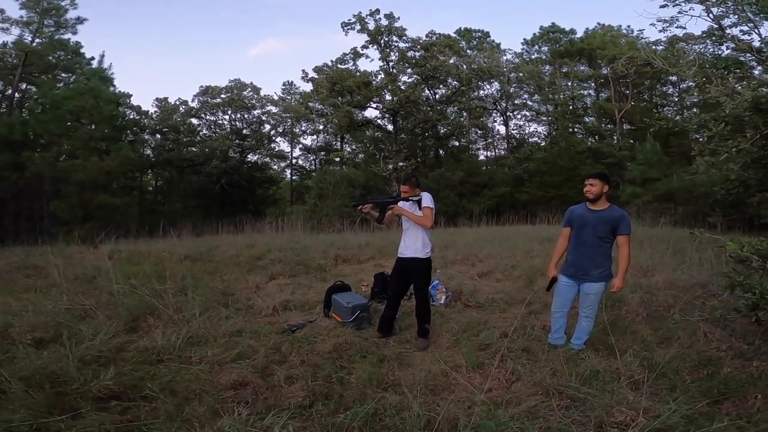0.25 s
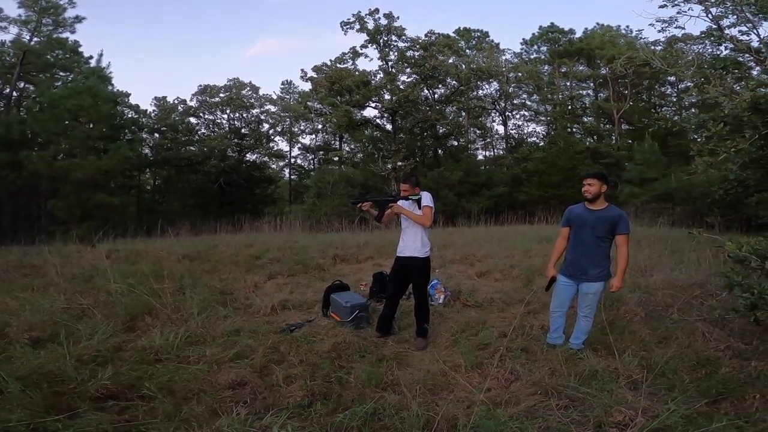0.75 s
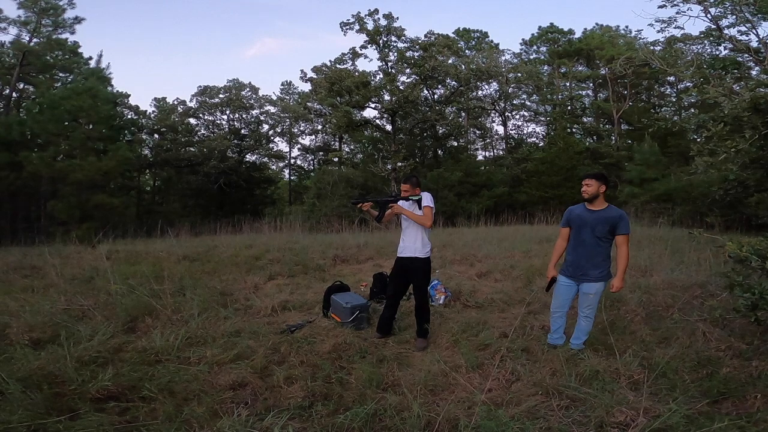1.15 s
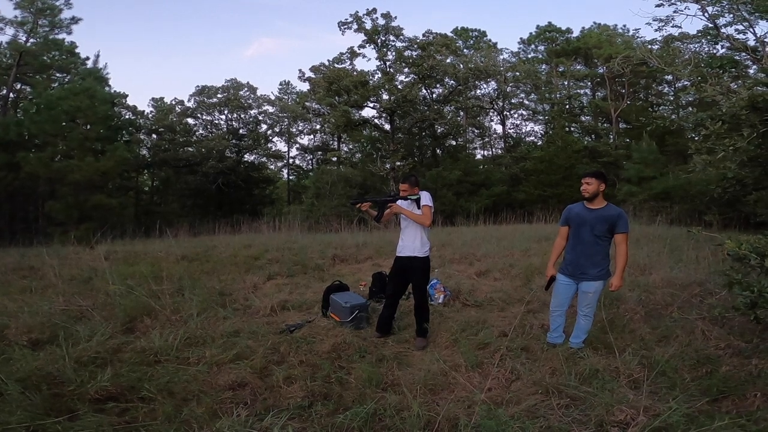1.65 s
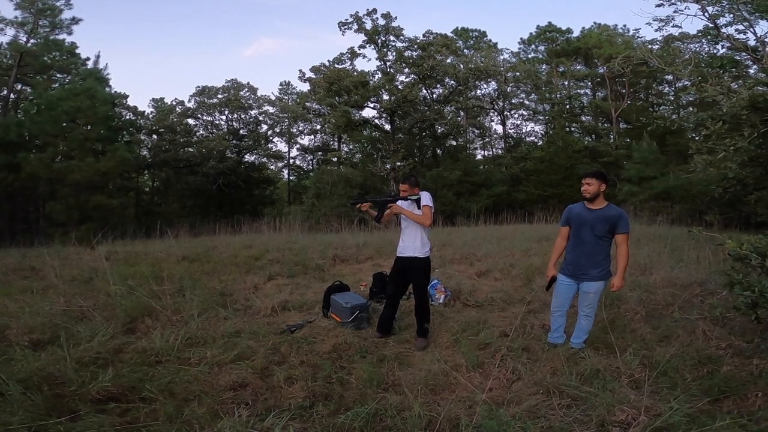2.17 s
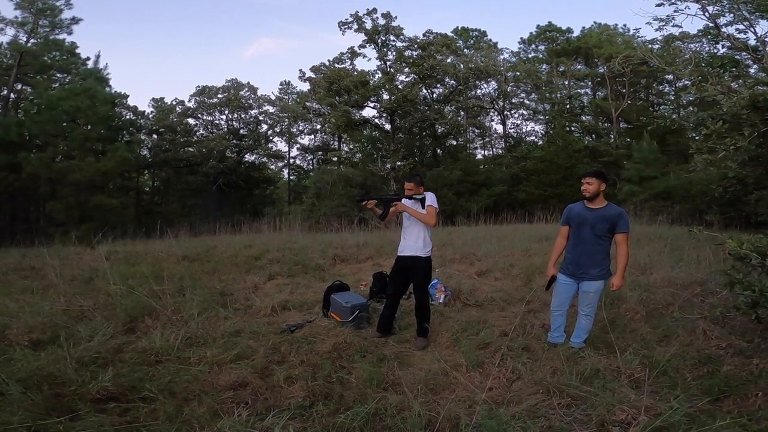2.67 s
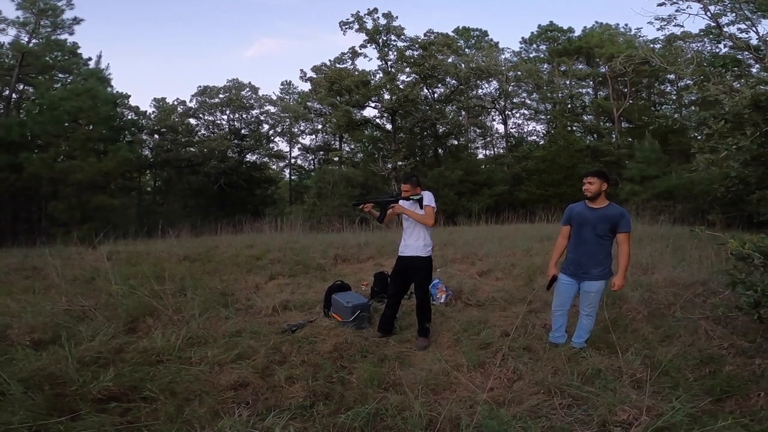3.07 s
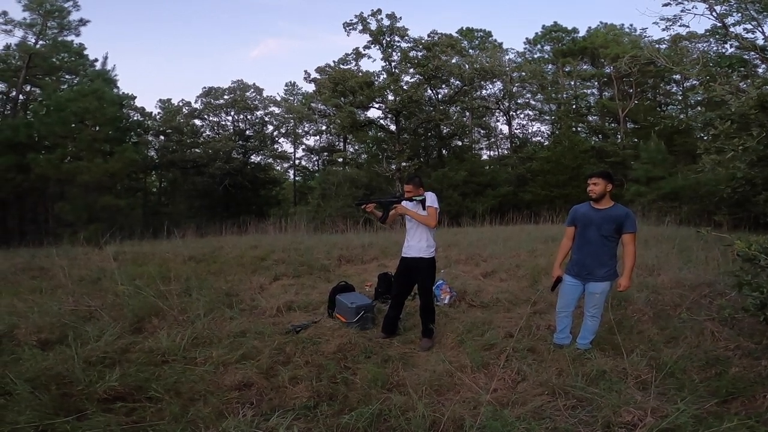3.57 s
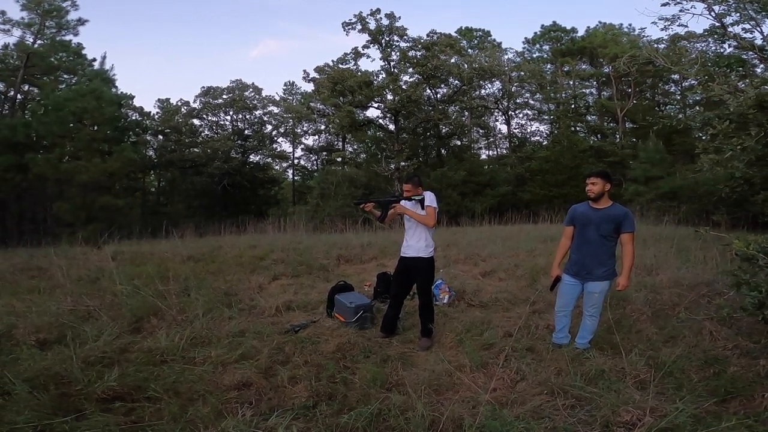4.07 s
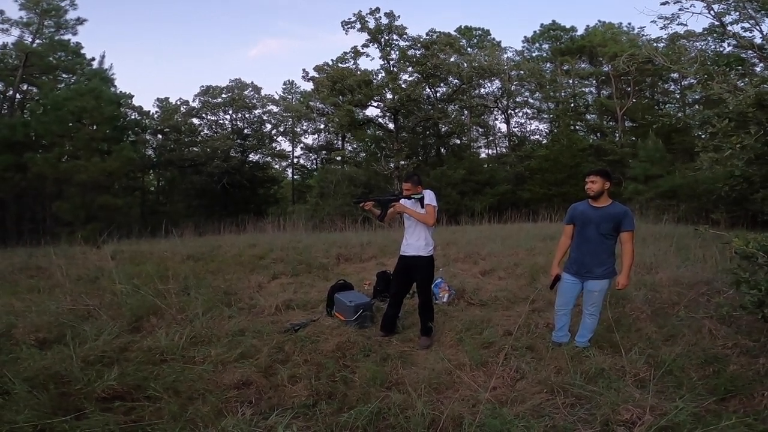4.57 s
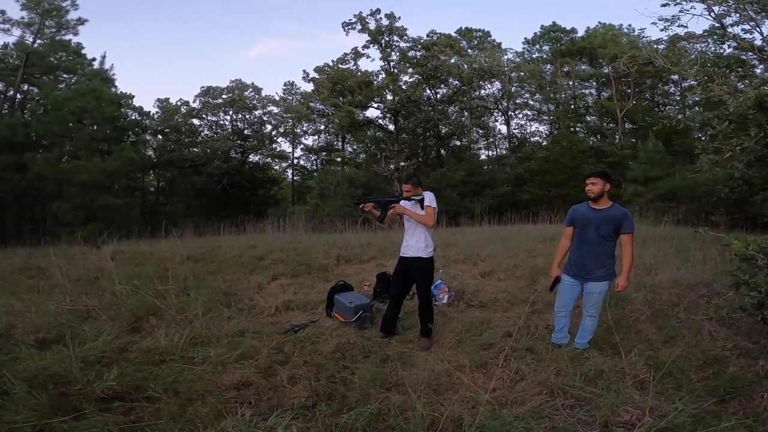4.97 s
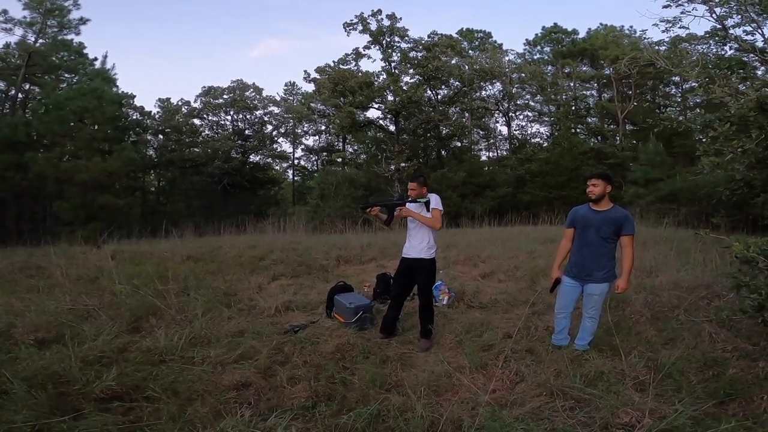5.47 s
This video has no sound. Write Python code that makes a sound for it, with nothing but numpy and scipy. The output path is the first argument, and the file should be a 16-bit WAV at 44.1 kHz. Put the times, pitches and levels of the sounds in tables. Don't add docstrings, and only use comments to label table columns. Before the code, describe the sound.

Crickets chirp in a quiet grassy clearing until a rifle blasts twice, overloading the microphone, each shot followed by a rolling echo from the woods.

```python
import sys
import numpy as np
from scipy import signal
from scipy.fft import rfft, irfft
from scipy.io import wavfile

SR = 44100
rng = np.random.default_rng(int(sys.argv[2]) if len(sys.argv) > 2 else 0)


def nominal_scale(level):
    x = np.asarray(level, float) / 20
    return 10 ** x


def to_wav(sig):
    pcm = np.clip(np.atleast_2d(sig), -1, 1) * 32767
    pcm = np.round(pcm).astype(np.int16)
    wavfile.write(sys.argv[1], SR, pcm.T)


N = 252368

# start in seconds, blast level in dB.
SHOTS = [
    (2.5186, -1.3),
    (5.2068, -2.66),
]
# frequency in Hz, density in dB per Hz.
ROLL_COLOUR = [(120, -29.5), (200, -22.5), (283, -7.5), (482, 2), (791, -9), (1100, -7), (3620, -18.5),
               (8900, -33), (16000, -55)]
# frequency in Hz, likeness from -1 to 1.
ROLL_LIKENESS = [(60, 1), (130, 1), (290, 1), (640, 0.86), (1410, 0.85), (3100, -0.59), (6820, 0.11),
                 (15000, -0.86)]
# frequency in Hz, left-right difference in dB.
ROLL_BALANCE = [(60, 3.5), (110, -2.5), (200, 1.0), (380, 3), (700, 4.5), (1290, 3), (2380, 6), (4400, 5.5),
                (8120, 1.5), (15000, 3)]
OLD_AGE_S = 3.38


def rms_one(x):
    return x / np.sqrt(np.mean(x ** 2) + 1e-20)


def at_hz(points, hz):
    points_hz, value = np.array(points).T
    return np.interp(np.log(hz), np.log(points_hz), value)


def drift(rate):
    r = np.exp(-80 * np.pi * rate / SR)
    slow = signal.lfilter([1], [1, -2 * r, r * r], rng.standard_normal(N // 40 + 2002))[2000:]
    return np.interp(np.arange(N) / 40, np.arange(len(slow)), rms_one(slow))


def ring(clicks, hz, t60):
    r, w = nominal_scale(-60 / (t60 * SR)), 2 * np.pi * hz / SR
    return signal.lfilter([0, np.sin(w)], [1, -2 * r * np.cos(w), r * r], clicks + 1e-18)


def low_pass(x, hz, order):
    return signal.sosfilt(signal.butter(order, min(hz, .45 * SR), fs=SR, output="sos"), x)


def without_bass(x, hz):
    return signal.sosfilt(signal.butter(1, hz, "high", fs=SR, output="sos"), x)


def sides(db):
    return nominal_scale(np.array([[db / 2], [-db / 2]]))


def add(out, x, s):
    i = round(s * SR)
    out[:, i:i + x.shape[1]] += x[:, :N - i]


def bands(source, colour, likeness, balance, age, patchy_db, treble_db=0, order=2, count=2):
    # frequency in Hz, loss in dB per second of travel.
    air_loss = [(200, -5), (500, -0.1), (1000, 2.5), (2000, 9.5), (4000, 24), (6000, 34), (8000, 48),
                (11000, 79), (16000, 108)]
    out, power, edges = 0, 0, 22 * 2 ** np.arange(0, 9.7, 1 / count)
    size = source.shape[-1]
    together = drift(6.5)[:size]
    for k, (low, high) in enumerate(zip(edges, edges[1:])):
        hz = np.sqrt(low * high)
        colour_db = at_hz(colour, hz)
        if colour_db < -90:
            continue
        band = signal.butter(order, [low, high], "band", fs=SR, output="sos")
        mid, side = signal.sosfilt(band, source[k % 2])
        alike = np.clip(at_hz(likeness, hz), -.9, .99)
        loss_db = age * at_hz(air_loss, hz) - treble_db * np.clip(np.log2(hz / 700), 0, 1)
        flicker_db = patchy_db * (together + drift(49)[:size])
        pair = np.sqrt(1 + alike) * mid + np.sqrt(1 - alike) * side * [[1], [-1]]
        out = out + nominal_scale(colour_db - loss_db + flicker_db) * sides(at_hz(balance, hz)) * pair
        power += nominal_scale(2 * colour_db) * 4 * (high - low) / SR
    return out / np.sqrt(power)


def clearing():
    # frequency in Hz, density in dB per Hz.
    hush_colour = [(15, -38.5), (25, -8.5), (80, 0.5), (217, -1.5), (285, -13), (463, -14.5), (714, -26.5),
                   (1130, -25), (2350, -35), (3820, -30.5), (5880, -43), (7310, -34.5), (8140, -35.5),
                   (9070, -32.5), (16000, -40.5)]
    # frequency in Hz, likeness from -1 to 1.
    hush_likeness = [(60, 0.91), (130, 0.66), (290, 0.51), (640, 0.67), (1410, 0.3), (3100, 0.39),
                     (6820, -0.25), (15000, -0.64)]
    balance = [(60, .1), (250, -1.1), (1000, .1), (8000, 1.1)]   # Hz, left-right dB
    noise = rng.standard_normal((2, 2, N))
    return nominal_scale(-52) * bands(noise, hush_colour, hush_likeness, balance, 0, patchy_db=.15, count=3)


def chorus():
    # pitch in Hz, level in dB, ringing t60 in seconds.
    far_bands = [
        (7130, -84, .012),
        (7630, -83, .014),
    ]
    out = np.zeros((2, N))
    for hz, db, t60 in far_bands:
        tone = ring(ring(rng.standard_normal((2, N)), hz, t60), hz, t60)
        out += nominal_scale(db + 1.5 * drift(3)) * rms_one(tone)
    return out


def cricket(chirps, hz, width):
    stroke_s = .0213
    t = np.arange(round(width * stroke_s * SR)) / SR
    out = np.zeros((2, N))
    for s, strokes, db in chirps:
        for k in range(round(strokes)):
            pitch, phase, level = rng.standard_normal(3)
            tone = np.sin(2 * np.pi * (hz + 25 * pitch) * t + phase * np.array([[1], [1.4]]))
            stroke = nominal_scale(db + 0.87 * k + .9 * level) * np.hanning(len(t)) * tone
            add(out, stroke, s + k * stroke_s - t[-1] / 2)
    return out


def far_cricket():
    # start in seconds, wing strokes, level in dB.
    far_chirps = [(.25, 4, -71), (.49, 4, -74), (.69, 5, -72), (.92, 5, -78), (1.11, 7, -79),
                  (1.63, 5, -76), (1.88, 4, -77), (2.14, 4, -81), (2.36, 3, -75), (4.41, 5, -89),
                  (4.65, 3, -83.5), (4.85, 5, -78), (5.09, 4, -83)]
    return cricket(far_chirps, hz=7635, width=1.7)


def near_cricket():
    # start in seconds, wing strokes, level in dB.
    near_chirps = [(.103, 5, -64), (.368, 4, -66), (.607, 5, -68), (.857, 5, -66), (1.108, 5, -64),
                   (1.356, 4, -67), (1.602, 5, -64.5), (1.923, 4, -63), (2.211, 5, -64), (4.639, 4, -75),
                   (4.86, 4, -68), (5.086, 3, -67.5)]
    return cricket(near_chirps, hz=7130, width=1.0)


def bird():
    # start in seconds, peak level in dB.
    chips = [
        (.005, -57),
        (.755, -56.5),
        (1.415, -53.5),
        (1.775, -71),
        (1.967, -52),
        (4.235, -68.5),
    ]
    chip_s, echo_db, echo_t60_s = 0.0136, -28.5, 0.55
    t = np.arange(round(chip_s * SR)) / SR
    chip = np.sqrt(np.hanning(len(t))) * signal.chirp(t, 5480, chip_s, 8260)
    after = np.arange(round(.4 * SR)) / SR
    out = np.zeros((2, N))
    for s, db in chips:
        blur = nominal_scale(echo_db - 60 * after / echo_t60_s) * rng.standard_normal((2, len(after)))
        blur[:, 0] = 1
        add(out, nominal_scale(db) * signal.fftconvolve(blur, chip[None]), s)
    return out


def scatter(per_s, spread_db, size):
    shape = (2, 2, size)
    sizes = nominal_scale(spread_db * np.minimum(rng.exponential(1, shape), 3.6)) * rng.choice([-1, 1], shape)
    return rms_one(sizes * (rng.random(shape) < per_s / SR))


def old_roll():
    size = round(SHOTS[0][0] * SR)
    t = np.arange(size) / SR
    roll = bands(scatter(4000, 2.5, size), ROLL_COLOUR, ROLL_LIKENESS, ROLL_BALANCE, OLD_AGE_S + t,
                 patchy_db=-0.77, order=3, count=3)
    fading = nominal_scale(-47.5 - 12.5 * t) * roll
    return np.pad(fading, [(0, 0), (0, N - size)])


def thump(age):
    # frequency in Hz, density in dB per Hz.
    bass_colour = [(15, -55), (25, -24), (65, -17), (135, 2.5), (260, -11), (340, -46.5), (570, -120)]
    hold_s, fall_db_per_s, murmur_db = 0.22, 79, -60.5
    fall = nominal_scale(-32 - fall_db_per_s * np.maximum(age - hold_s, 0)) + nominal_scale(murmur_db)
    noise = rng.standard_normal((2, 2, len(age)))
    body = bands(noise, bass_colour, [(60, .8), (300, 1.0)], ROLL_BALANCE, 0, patchy_db=1.7)
    deep = rms_one(without_bass(low_pass(rng.standard_normal(len(age)), 90, order=4), 60))
    rumble_db = -43.5 - 16.5 * age + 4.3 * drift(5)[:len(age)]
    return fall * body + nominal_scale(rumble_db) * deep


def woods(pulse):
    # seconds after the shot, level in dB.
    roll_level = [(.02, -39), (.045, -38), (.11, -28.5), (.31, -23.5), (.6, -28.5), (.9, -33.5),
                  (1.45, -40), (2.0, -43.5), (2.65, -46)]
    # time in seconds, peak level in dB, left-right difference in dB.
    trunks = [(2.562, -37, 12), (2.587, -6, 3), (2.664, -6.5, 7), (2.991, -11, 4), (3.093, -11, 5),
              (3.27, -21, 2), (3.33, -26, -9), (3.379, -36, -4), (3.448, -23.5, -1), (3.566, -21, -2),
              (3.627, -36, -2), (3.659, -23, 1)]
    first, second = SHOTS[0][0], SHOTS[1][0]
    size = round((second - first) * SR)
    age = np.arange(size) / SR
    level_db = np.interp(age, *np.transpose(roll_level))
    treble_db = 8.5 * np.exp(-age / .1)
    roll = nominal_scale(level_db) * bands(scatter(2500, 2.2, size), ROLL_COLOUR, ROLL_LIKENESS, ROLL_BALANCE,
                                 age ** 1.042 - .15, patchy_db=0.82, treble_db=treble_db, order=3, count=5)
    roll += thump(age)
    roll += nominal_scale(-72.5 - 11.5 * age) * low_pass(rng.standard_normal((2, size)), 10000, order=8)
    roll *= np.clip(age / 0.017, 0, 1)
    knock = without_bass(pulse, 300)[:, :400] * np.hanning(800)[400:]
    for s, db, pan_db in trunks:
        dulled = low_pass(knock, 2500 / (s - first + 0.27), order=6)
        add(roll, nominal_scale(db - 12.5) * sides(pan_db) * dulled, s - first)
    out = np.zeros((2, N))
    add(out, roll, first)
    add(out, nominal_scale(-1.83) * roll, second)
    return out


def ghost(pulse, lead):
    size = 2 * pulse.shape[1]
    room = size // 20
    hz = np.arange(size // 2 + 1) * SR / size
    chance = rng.standard_normal(200) + .5 * rng.standard_normal((2, 200))
    ripple_db = 2 * np.array([np.interp(hz / 250, np.arange(200), c) for c in chance])
    dip_db = -0.5 * np.exp(-((hz - 1040) / 300) ** 2)
    gain = hz / np.hypot(hz, 40) / np.sqrt(1 + (hz / 6600) ** 8.9) * nominal_scale(dip_db + ripple_db)
    late = np.exp(-2j * np.pi * hz * .0006 / (1 + (hz / 700) ** 2))
    spectrum = rfft(np.pad(pulse, [(0, 0), (room, 0)]), size)
    wave = irfft(spectrum * gain * late, size)[:, room - lead:size // 2]
    return wave * np.clip(np.arange(wave.shape[1]) / lead, 0, 1)


def blast():
    # frequency in Hz, level in dB, t60 in seconds,
    # left-right difference in dB, delay in ms.
    modes = [(52.6, -24.5, .12, 12.5, 1.1), (162, -23, 0.041, 0.5, 0.53), (236.5, -5.5, 0.062, 2, 1.2),
             (1048, 1.5, 0.006, -1.2, 0), (558.6, 1, 0.018, -1, 0.94), (395.6, -19, .05, 1, 0.78),
             (710, -17, 0.073, -3, .6), (2030, -24, 0.036, 0, 0.0083), (3400, -21, 0.023, 25.5, 1.1),
             (8750, -18.5, 0.0013, .1, 0.3)]
    steps = np.arange(round(.15 * SR))
    body = np.zeros((2, len(steps)))
    for hz, db, t60, pan_db, late_ms in modes:
        jump = 1. * (steps == round(late_ms * SR / 1000))
        body += nominal_scale(db) * sides(pan_db) * ring(jump, hz, t60)
    gas = low_pass(rng.standard_normal((2, len(steps))), 2600, order=2)
    crack = nominal_scale(1.5 - 60 * steps / SR / 0.053) * gas
    limiter = nominal_scale(np.interp(steps / SR, (.010, .018), [0, -11]))
    return limiter * (body + crack)


def shots():
    # steps of 512/48000 s
    # ahead, level in dB at the first shot, level in dB at the second.
    ghosts = [
        (1, -7, -6),
        (2, -9, -9),
        (3, -19, -21),
    ]
    # frequency in Hz, level in dB, t60 in seconds.
    lead_tones = [(1000, -17, 0.6), (7800, -36.5, 0.17)]
    # start in seconds, level in dB.
    ticks = [
        (2.479, -22),
        (2.4845, -29.5),
        (5.165, -26),
        (5.1692, -25.5),
    ]
    step_s, lead = 512 / 48000, 40
    snap_db, snap_s = (-11, -6.5), .0011
    out = np.zeros((2, N))
    ahead = np.arange(round(4 * step_s * SR))[::-1] / SR
    swell = np.hanning(2 * len(ahead))[:len(ahead)]
    for k, (s, db) in enumerate(SHOTS):
        pulse = blast()
        add(out, nominal_scale(db) * pulse, s)
        snap = np.linspace([-1, -1], [1, 1], round(snap_s * SR)).T
        add(out, nominal_scale(snap_db[k]) * snap, s - snap_s / 2)
        for steps_ahead, *ghost_db in ghosts:
            early = (-1) ** round(steps_ahead) * nominal_scale(ghost_db[k]) * ghost(pulse, lead)
            add(out, early, s - round(steps_ahead) * step_s - lead / SR)
        for hz, edge_db, t60 in lead_tones:
            wave = nominal_scale(edge_db - 60 * ahead / t60) * swell * np.sin(-2 * np.pi * hz * ahead)
            add(out, np.array([wave, wave]), s - ahead[0])
    for s, db in ticks:
        add(out, nominal_scale(db) * pulse[:, :200] * np.hanning(400)[200:], s - .0007)
    return out


def recorder_gain_db():
    drop_db, hold_s, recovery_s = -25.5, .7, 1.28
    t = np.arange(N) / SR
    gains = []
    for shot_s in [-OLD_AGE_S] + [s for s, db in SHOTS]:
        age = t - shot_s
        gains.append((age > 0) * drop_db * np.exp(-np.maximum(age - hold_s, 0) / recovery_s))
    return np.min(gains, axis=0)


def scene():
    background = nominal_scale(recorder_gain_db()) * (clearing() + chorus())
    animals = near_cricket() + far_cricket() + bird()
    left, right = background + animals + old_roll() + woods(blast()) + shots()
    return np.array([np.pad(left, (4, 0))[:N], right])


def band_limit(x):
    return signal.sosfilt(signal.butter(12, 16460, fs=SR, output="sos"), x)


def record(dry):
    thinned = without_bass(without_bass(dry, 28), 28)
    top_cut = signal.cheby2(10, 60, 16200, fs=SR, output="sos")
    cut = signal.sosfilt(top_cut, np.clip(thinned, -1, 1))
    return band_limit(np.clip(cut, -1, 1))


dry = scene()
out = record(dry)
to_wav(out)
```